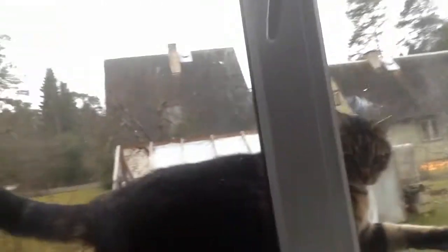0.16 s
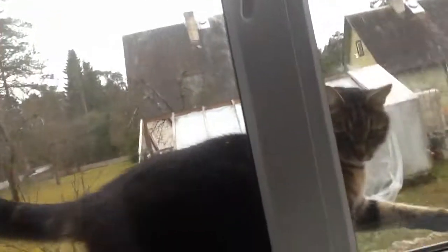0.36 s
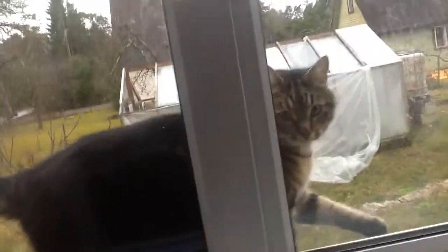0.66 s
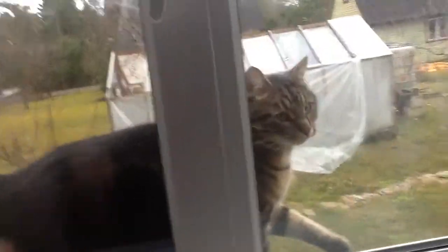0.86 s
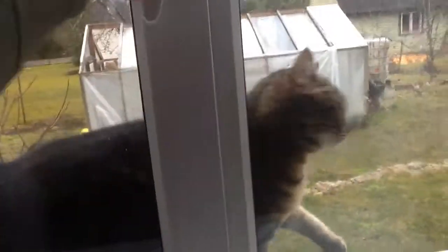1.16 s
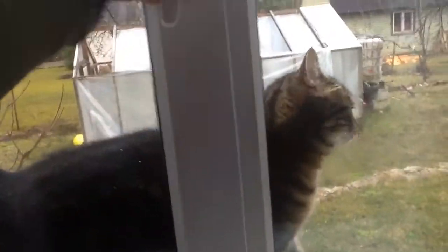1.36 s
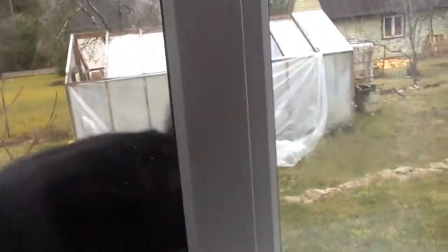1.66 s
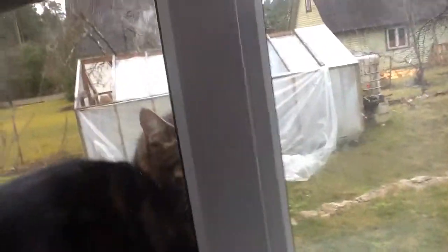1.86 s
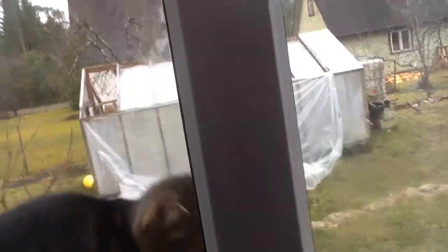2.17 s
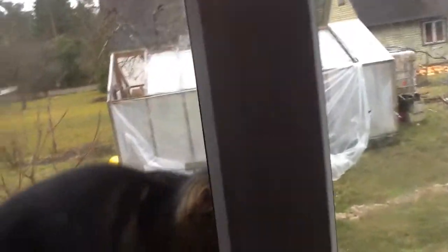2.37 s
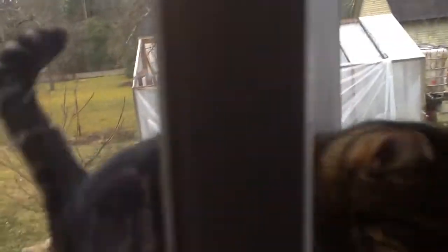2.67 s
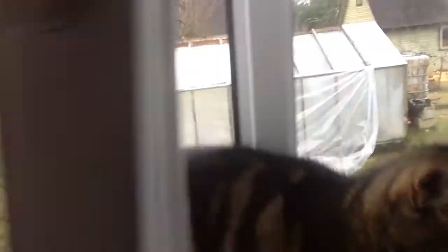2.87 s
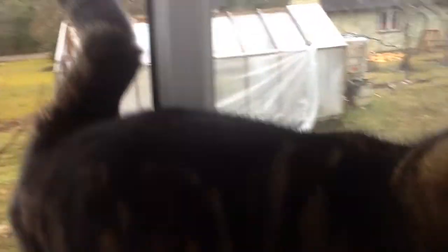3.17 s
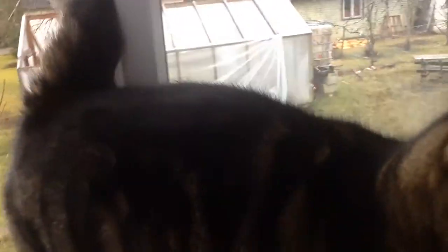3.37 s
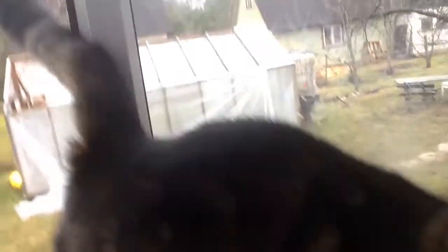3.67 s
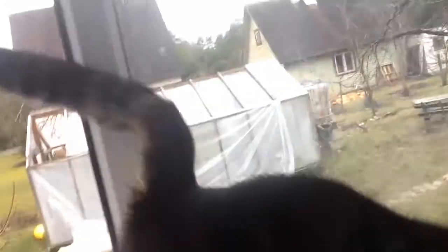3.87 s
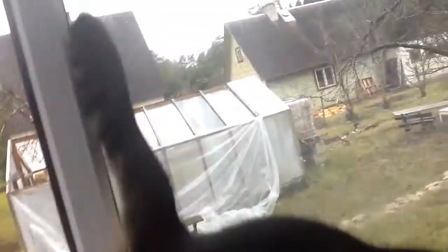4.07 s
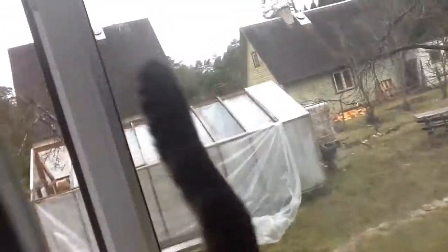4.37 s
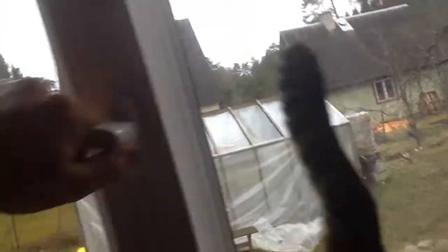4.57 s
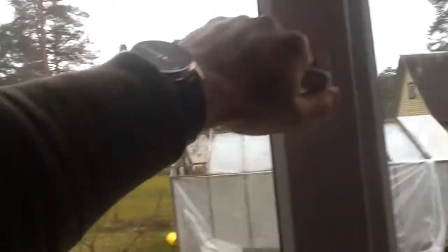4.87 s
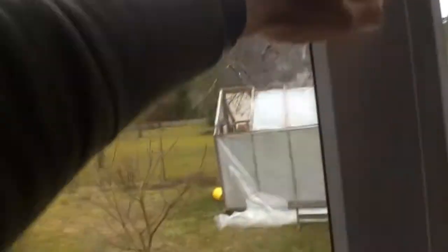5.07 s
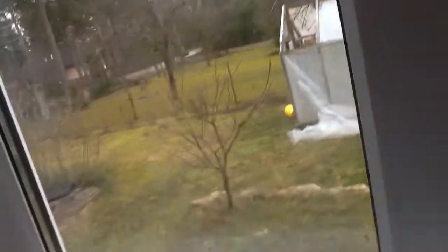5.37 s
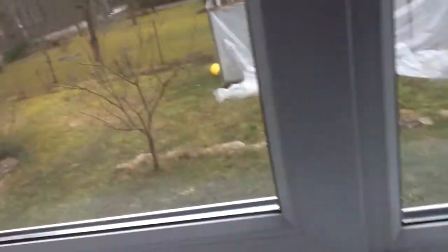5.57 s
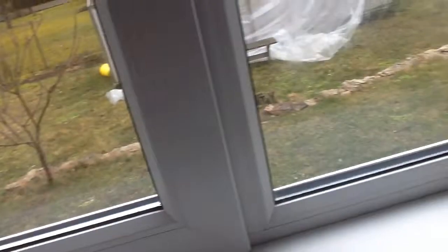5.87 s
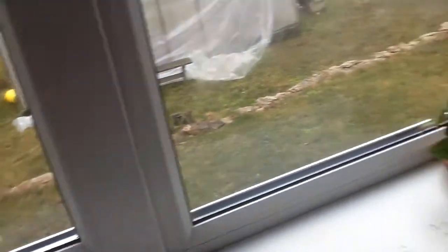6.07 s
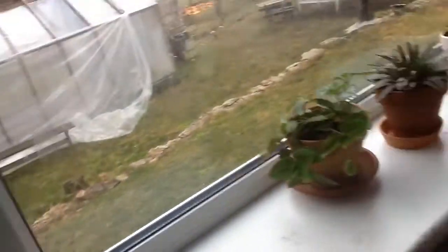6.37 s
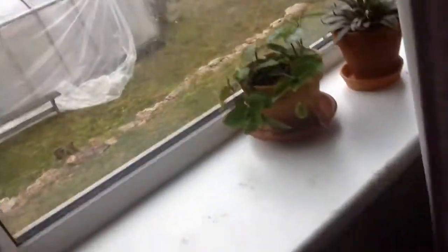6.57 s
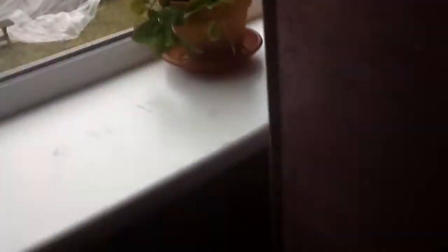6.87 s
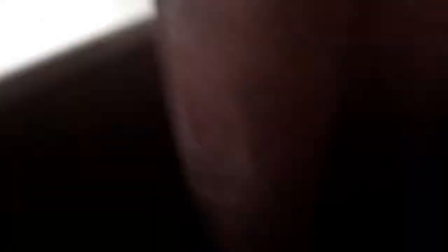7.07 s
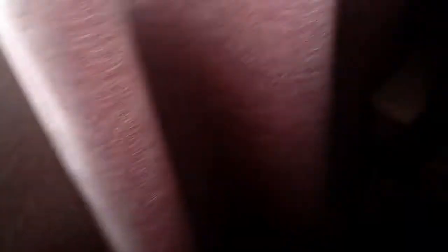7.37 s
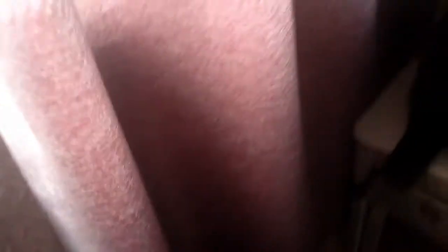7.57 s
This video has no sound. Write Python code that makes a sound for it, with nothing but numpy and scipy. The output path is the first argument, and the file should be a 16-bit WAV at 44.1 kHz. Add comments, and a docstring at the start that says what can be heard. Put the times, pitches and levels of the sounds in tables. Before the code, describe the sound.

A plastic window clicks and scrapes, faint birds whistle in a lull, then it bangs shut and padded steps follow with rustling clothes.

```python
"""A plastic-framed window with a cat on the sill outside; the microphone is just inside a quiet room.
The frame ticks, bumps and scrapes as the window is handled, and far birds whistle faintly in the lull.
Near 4.9 s a hand pushes the sash shut with one loud knock: the plastic cracks and the pane rings.
Soft footfalls, close swishes of sleeve and a last bump follow as the microphone's holder turns away."""
import sys
import numpy as np
from scipy import signal
from scipy.fft import rfft, irfft
from scipy.io import wavfile
from scipy.ndimage import uniform_filter1d

SR = 44100
rng = np.random.default_rng(int(sys.argv[2]) if len(sys.argv) > 2 else 0)


def dump_mix(stems):
    """Bounce the given channels to the path in sys.argv[1] as a 16-bit WAV at rate SR."""
    frames = np.atleast_2d(stems).T  # one column per channel
    limited = np.clip(frames, -1, 1)  # hard clip at full scale
    pcm = np.round(limited * 32767).astype(np.int16)
    wavfile.write(sys.argv[1], SR, pcm)


N = 340893
TIME = np.arange(N) / SR
AGE = TIME[:SR]  # seconds since a contact


def undb(db):
    """Decibels to gain."""
    return 10 ** (np.asarray(db) / 20)


def unit(x):
    """Scale to rms 1."""
    return x / np.sqrt(np.mean(x ** 2))


def at_hz(points, hz):
    """Read (Hz, value) points on a log-frequency axis."""
    f, value = np.transpose(points)
    return np.interp(np.log(np.maximum(hz, 1)), np.log(f), value)


def tint(x, points, size=4096):
    """Causal filter with the given (Hz, dB) colour; white noise keeps its level."""
    gain = undb(at_hz(points, np.arange(size // 2 + 1) * SR / size))
    cepstrum = irfft(np.log(gain))
    cepstrum[1:size // 2] *= 2  # fold to minimum phase
    cepstrum[size // 2 + 1:] = 0
    response = irfft(np.exp(rfft(cepstrum)))
    return signal.fftconvolve(x, response / np.linalg.norm(response))[:len(x)]


def sieve(x, hz, kind, order=1):
    """Butterworth filter."""
    sos = signal.butter(order, np.minimum(hz, SR / 2 - 500), kind, fs=SR, output="sos")
    return signal.sosfilt(sos, x)


def resonance(x, hz, width):
    """One broad resonance; its width is a share of its pitch."""
    return sieve(x, [hz / (1 + width / 2), hz * (1 + width / 2)], "band", order=2)


def fade(t60):
    """Exponential decay, 60 dB in t60 seconds."""
    return np.exp(-np.log(1000) * AGE / max(t60, 1e-3))


def spell(start, length, attack, release):
    """Envelope, in seconds: a straight rise, a hold until start + length, an exponential release."""
    rise = np.clip((TIME - start) / attack, 0, 1)
    return rise * np.exp(-np.maximum(TIME - start - length, 0) / release)


def burst(shape, t60, rise_s):
    """A dying shower of micro-contacts, filtered by shape; it starts near rms 1."""
    envelope = fade(t60) * (1 - np.exp(-AGE / rise_s))
    x = shape(rng.standard_normal(SR) * envelope)
    return x * np.linalg.norm(envelope) / np.linalg.norm(x)


def add(out, s, x):
    """Mix x into out from time s."""
    i = max(int(s * SR), 0)
    out[i:i + len(x)] += x[:N - i]


def wander(per_s):
    """Smooth random drift at rms 1."""
    hold = int(SR / per_s)
    steps = np.repeat(rng.standard_normal(N // hold + 1), hold)
    return unit(uniform_filter1d(steps, hold)[:N])


def friction(slips_per_s, spread_db):
    """Dense tiny slips of uneven size."""
    slips = (rng.random(N) < slips_per_s / SR) * rng.standard_normal(N)
    return unit(slips * undb(spread_db * np.minimum(rng.exponential(size=N), 4)))


def room_tone():
    """Still room air and the even hiss of the microphone."""
    # The hiss's colour. Each row: frequency in Hz, relative level in dB.
    colour = [(30, -24), (60, -17), (110, -5.5), (170, 3.5), (290, 5), (400, 1.5), (600, -2.5), (1000, -3),
              (2000, -6.5), (5000, -7.5), (12000, -10.5), (15400, -12.5)]
    return tint(rng.standard_normal(N), colour) * undb(-63.5)


def handling_rustle():
    """Dull rustle of body and grip at the microphone, in spells with stillness between them."""
    # Spells of moving about. Each row: start in seconds, length in seconds, level in dB.
    shifts = [(-.1, 0.52, -54), (0.417, 0.53, -55.5), (1.008, 0.41, -55), (1.383, 0.24, -48.5),
              (1.803, 0.18, -53.5), (2.298, .85, -68.5), (4.56, 0.49, -64), (4.913, 0.3, -59),
              (5.2, 1.17, -63), (6.37, 0.76, -58), (7.35, 0.1, -69)]
    # The rustle's colour. Each row: frequency in Hz, relative level in dB.
    colour = [(29, -67), (50, -35), (77, -12.5), (140, -1), (292, -2.5), (354, -0.5), (544, -6),
              (1010, -10.5), (1110, -12.5), (1350, -14), (4890, -23.5), (15000, -34)]
    effort = sum(undb(db) * spell(s, length, attack=0.082, release=0.052) for s, length, db in shifts)
    return tint(friction(slips_per_s=4000, spread_db=0.4), colour) * effort * undb(2.0 * wander(25))


def footfalls():
    """Padded blows on sill, floor and furniture: the weight lands, then settles more softly."""
    # Steps and bumps. Each row: time in seconds, level in dB, treble cutoff in Hz.
    thuds = [(.005, -47.5, 350), (.579, -50.5, 650), (.829, -50, 1510), (1.464, -51, 500),
             (1.921, -48, 400), (2.028, -49.5, 260), (2.731, -58.5, 350), (2.937, -51, 380),
             (3.0, -49, 1020), (4.965, -32, 600), (5.069, -41, 120), (5.292, -48, 710), (5.352, -50.5, 610),
             (5.452, -44.5, 700), (5.577, -30, 760), (5.727, -33, 570), (5.821, -37, 280),
             (5.898, -56, 1200), (6.055, -42, 270), (6.72, -57, 600), (7.026, -46.5, 820),
             (7.240, -45.5, 230)]
    # The colour of the struck surface. Each row: frequency in Hz, relative level in dB.
    body = [(50, -22.5), (90, -13.5), (150, 0), (240, 0), (300, -8), (390, -2.5), (520, -10.5), (850, -8),
            (2000, -18), (8000, 10)]
    settle_s, settle_db = 0.024, -3.5
    out = np.zeros(N)
    for s, db, cutoff_hz in thuds:
        padded = lambda x: sieve(tint(x, body), cutoff_hz, "low", order=3)
        add(out, s, undb(db) * burst(padded, t60=0.2, rise_s=0.0011))
        add(out, s + settle_s, undb(db + settle_db) * burst(padded, t60=0.2, rise_s=0.0018))
    return out


def sash_ring():
    """One ring of sash and pane; rattling in the seal makes every mode waver."""
    # Modes of sash and pane. Each row: pitch in Hz, relative level in dB, t60 in seconds.
    modes = [(83.7, -29, 0.9), (133.5, 1, 0.1), (171.7, 1.5, .17), (212, -4, 0.067), (251.8, -3, 0.24),
             (316.3, -8.5, 0.23), (379, -6, 0.11), (485, -7, 0.068), (570, -4.5, 0.083), (735, -22, 0.08),
             (890, -4, 0.033), (947, -17, 0.082), (1270, -18, 0.038), (1740, -16, 0.06), (2950, -37, 0.063),
             (3120, -15.5, 0.056), (3960, -17, .05), (4360, -19, .05)]
    detune_share, ring = 0.015, 0
    for k, (hz, db, t60) in enumerate(modes):
        rattle = np.interp(AGE, np.linspace(0, 1, 120), rng.standard_normal(120))
        phase = 2 * np.pi * hz * np.cumsum(1 + detune_share * rattle) / SR
        ring = ring + (-1) ** k * undb(db) * fade(t60) * np.sin(phase)
    onset = 1 - np.exp(-AGE / 0.0022)  # the bending wave takes a moment to fill the pane
    return undb(-1) * ring * onset


def sash_knocks():
    """Each blow cracks in the plastic frame and sets sash and pane ringing."""
    # Blows on the sash. Each row: time in seconds, ring gain in dB, crack level in dB,
    # crack t60 in seconds, crack treble cutoff in Hz.
    blows = [(.049, -64, -39, 0.047, 1800), (.311, -44, -41.5, 0.059, 907), (.358, -47, -40.5, 0.1, 2160),
             (.938, -47.5, -60, .03, 1200), (1.053, -45, -41.5, 0.096, 1960),
             (1.370, -60, -24.5, 0.071, 2310), (1.375, -57, -27.5, 0.029, 8000),
             (1.419, -42, -30, 0.077, 4000), (1.790, -43, -32.5, 0.082, 1370),
             (4.9297, -49, -16.5, 0.035, 6000), (4.9336, -21.5, -15, 0.031, 6540),
             (4.9449, -17.5, -22, 0.035, 6000), (4.954, -25, -27, 0.094, 3000),
             (5.059, -42, -31, .075, 1870), (5.438, -47, -43.5, 0.12, 1300), (6.042, -51, -39, .06, 800),
             (7.019, -42, -40.5, .08, 1390), (7.2319, -41.5, -32, 0.077, 2520),
             (7.253, -54, -39.5, 0.17, 2440)]
    # The crack's colour. Each row: frequency in Hz, relative level in dB.
    plastic = [(90, -8), (200, -7.5), (420, 2.5), (850, -0.5), (1400, -1.5), (2200, -8), (3300, -6),
               (5000, -9.5), (8000, -10.5), (15000, -19)]
    out, ring = np.zeros(N), sash_ring()
    for s, ring_db, crack_db, t60, cutoff_hz in blows:
        crack = burst(lambda x: sieve(tint(x, plastic), cutoff_hz, "low"), t60, rise_s=0.0026)
        add(out, s, undb(ring_db) * ring + undb(crack_db) * crack)
    return out


def frame_ticks():
    """Hard little contacts on the frame: each snaps at its own pitch, and the air chamber answers."""
    # Ticks. Each row: time in seconds, snap level in dB, snap pitch in Hz, chamber level in dB.
    contacts = [(.0868, -38, 2050, -54), (1.0965, -24.5, 2610, -43.5), (1.169, -41.5, 2960, -60),
                (1.292, -41, 1980, -44.5), (1.332, -34, 4060, -46), (1.363, -30.5, 5160, -45),
                (1.483, -41, 1600, -34.5), (1.5076, -32, 3500, -37), (1.543, -37.5, 8900, -48),
                (1.569, -32, 3510, -38), (1.6228, -36, 1540, -44), (1.6615, -43, 3970, -62),
                (1.789, -44, 1400, -33.5), (1.870, -50, 2500, -43), (1.948, -34, 6300, -33.5),
                (2.479, -43.5, 2650, -52.5), (4.1413, -43.5, 3100, -70), (4.179, -51, 2800, -60),
                (4.420, -47.5, 660, -59), (4.9452, -16.5, 3850, -35), (5.056, -37, 2680, -55),
                (5.1034, -44, 3090, -50), (5.407, -49, 2000, -51), (5.651, -48, 2200, -53),
                (6.539, -43.5, 1650, -44.5), (6.547, -37, 890, -45), (6.659, -43.5, 3700, -60),
                (7.087, -48, 5500, -52), (7.582, -47, 1540, -56), (7.609, -47.5, 784, -67)]
    chamber = lambda x: resonance(x, hz=1110, width=0.7)
    out = np.zeros(N)
    for s, snap_db, hz, hollow_db in contacts:
        dull_click = lambda x: 0.032 * sieve(x, 2 * hz, "low", order=2)
        snap = burst(lambda x: resonance(x, hz, width=0.64) + dull_click(x), t60=0.011, rise_s=0.00015)
        hollow = burst(chamber, t60=0.034, rise_s=0.00015)
        add(out, s, undb(snap_db) * snap + undb(hollow_db) * hollow)
    return out


def squeaks():
    """Short, hoarse rubbing squeaks: each swells, holds as long again and dies, sagging in pitch."""
    # Squeaks. Each row: start in seconds, swell in seconds, first pitch in Hz, level in dB.
    rubs = [(.11, 0.055, 1314, -53), (5.061, 0.0042, 574, -35), (5.318, 0.0043, 5000, -48.5),
            (6.144, 0.0066, 885, -51.5)]
    sag_hz_per_s, out = 440, 0
    hoarse = unit(sieve(rng.standard_normal(N), 70, "low", order=2))
    for s, swell, hz, db in rubs:
        pitch = hz - sag_hz_per_s * np.clip(TIME - s, 0, 1)
        envelope = spell(s, 2 * swell, attack=swell, release=1.7 * swell)
        out = out + undb(db) * envelope * np.sin(2 * np.pi * np.cumsum(pitch) / SR)
    return out * hoarse


def sleeve_swishes():
    """Fine fibres slide over each other close to the microphone; folds make each stroke crinkle."""
    # Sleeve strokes. Each row: peak time in seconds, level in dB, width in seconds, treble cutoff in Hz.
    strokes = [(.75, -54.5, 0.028, 18000), (.92, -60, 0.11, 10300), (1.085, -53.5, 0.022, 12000),
               (1.19, -49, 0.014, 4500), (5.325, -54, 0.054, 8500), (5.61, -52, 0.057, 6000),
               (5.755, -56, 0.013, 4940), (5.835, -57, 0.018, 5500), (6.5, -66, 0.28, 9000),
               (6.657, -52.5, 0.011, 8000), (6.73, -56, 0.02, 4970), (6.859, -53.5, 0.044, 18000),
               (7.01, -56.5, 0.04, 13000), (7.107, -47.5, 0.029, 18000)]
    # The cloth's colour. Each row: frequency in Hz, relative level in dB.
    cloth = [(200, -1), (700, 1), (2000, -2), (4000, 0), (7000, 0), (11000, -2.5), (15000, -6.5)]
    skew = 1.16  # a stroke swells faster than it dies
    fibres = tint(friction(slips_per_s=9000, spread_db=0.82), cloth)
    crinkle_db, out = 1.85 * wander(220), np.zeros(N)
    for s, db, width, cutoff_hz in strokes:
        near = np.abs(TIME - s) < 5 * width
        t = TIME[near] - s
        stroke = np.exp(-(t / np.where(t < 0, width / skew, width * skew)) ** 2 / 2)
        out[near] += sieve(fibres[near], cutoff_hz, "low", order=2) * stroke * undb(db + crinkle_db[near])
    return out


def frame_scrapes():
    """The sash sticks and slips along the frame in short rubs."""
    # Rubs. Each row: start in seconds, length in seconds, gain in dB, treble cutoff in Hz.
    rubs = [(1.06, .07, -47.5, 3000), (1.317, 0.028, -45, 6000), (1.353, 0.023, -37, 11000),
            (1.389, 0.046, -35, 11000), (1.493, .09, -42.5, 3500), (1.754, 0.055, -39.5, 1760),
            (1.842, 0.11, -55, 2000), (4.91, 0.017, -39.5, 4500)]
    # The scrape's colour. Each row: frequency in Hz, relative level in dB.
    colour = [(70, -27), (150, 4.5), (400, 4), (850, -2.5), (1500, -6.5), (2200, -9), (3600, -8.5),
              (7500, -12), (11000, -11), (15000, -27)]
    slips = tint(friction(slips_per_s=5000, spread_db=1.7), colour)
    pushes = [(undb(db) * spell(s, length, attack=0.011, release=0.014), cutoff_hz)
              for s, length, db, cutoff_hz in rubs]
    edges_hz, out = np.geomspace(80, 16000, 12), 0
    for lo, hi in zip(edges_hz, edges_hz[1:]):
        centre_hz = np.sqrt(lo * hi)
        force = sum(push / np.hypot(1, (centre_hz / cutoff_hz) ** 2.2) for push, cutoff_hz in pushes)
        # as the contact point moves it favours now one resonance of the frame, now another
        out = out + sieve(slips, [lo, hi], "band", order=2) * force * undb(2.3 * wander(60))
    return out * undb(1.2 * wander(90))


def far_birds():
    """Gliding bird whistles far outdoors, smeared by echoes, barely above the hiss."""
    # Whistles. Each row: start in seconds, length in seconds, first and last pitch in Hz, level in dB.
    whistles = [(2.45, 0.38, 2600, 2404, -68.5), (2.878, 0.23, 2100, 1940, -65),
                (3.078, 0.18, 2900, 3030, -71), (3.9, 0.43, 5200, 4360, -68),
                (4.042, 0.24, 2000, 1900, -63), (4.23, .29, 2470, 2180, -62.5),
                (4.24, 0.16, 4870, 5180, -66), (4.3, 0.41, 3930, 4070, -73)]
    out, smear = np.zeros(N), unit(sieve(rng.standard_normal(N), 70, "low"))
    for s, length, first_hz, last_hz, db in whistles:
        n = int(length * SR)
        pitch = np.linspace(first_hz, last_hz, n)
        add(out, s, undb(db) * np.hanning(n) * np.sin(2 * np.pi * np.cumsum(pitch) / SR))
    return out * smear


def room_echoes(x):
    """A furnished room around the microphone: diffuse echoes whose treble dies first."""
    # The room's decay. Each row: frequency in Hz, t60 in seconds.
    decay = [(125, 0.42), (500, 0.4), (2000, 0.36), (5000, 0.29), (12000, 0.31)]
    edges_hz, tail = np.geomspace(60, 16000, 9), 0
    for lo, hi in zip(edges_hz, edges_hz[1:]):
        band = sieve(rng.standard_normal(SR), [lo, hi], "band", order=3)
        tail = tail + band * fade(at_hz(decay, np.sqrt(lo * hi)))
    build_up = np.clip(AGE / 0.0077, 0, 1)
    tail = tint(tail * build_up, [(100, -5.5), (400, -0.5), (1500, -1.5), (4000, 0.0), (12000, -10)])
    return signal.fftconvolve(x, tail / np.linalg.norm(tail))[:N]


def scene():
    """Mono, from just inside the window: frame and steps echo in the room, close clothes stay dry."""
    window, ticks, steps = sash_knocks() + frame_scrapes(), frame_ticks(), footfalls()
    echoes = room_echoes(undb(-12.0) * window + undb(-16.5) * ticks + undb(-15.5) * steps)
    clothes = sleeve_swishes() + handling_rustle()
    return (window + ticks + steps + echoes + clothes + squeaks() + far_birds() + room_tone())[None]


def record(dry):
    """The phone's microphone drops the deep bass and cuts the top."""
    bass_hz, top_hz = 81, 15500
    thin = sieve(dry, bass_hz, "high", order=2)
    return signal.sosfilt(signal.ellip(10, .1, 70, top_hz, fs=SR, output="sos"), thin)


dry = scene()
out = record(dry)
dump_mix(out)
```